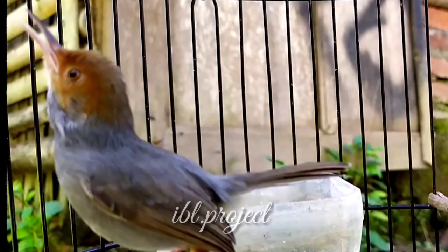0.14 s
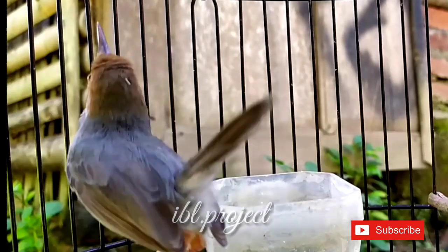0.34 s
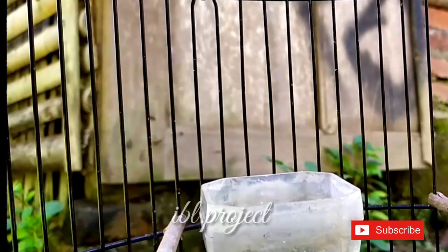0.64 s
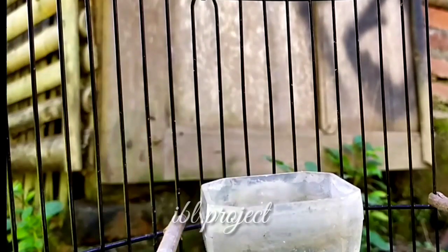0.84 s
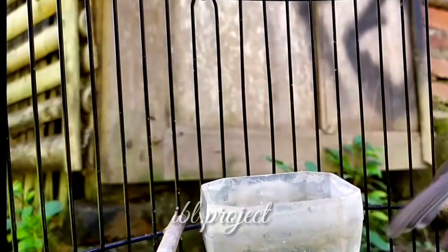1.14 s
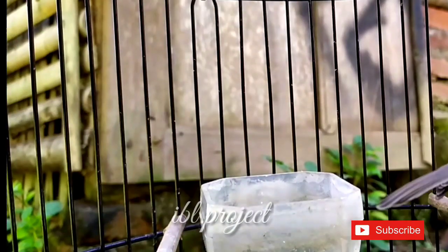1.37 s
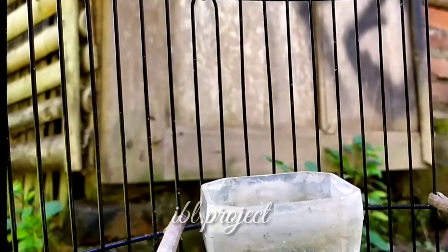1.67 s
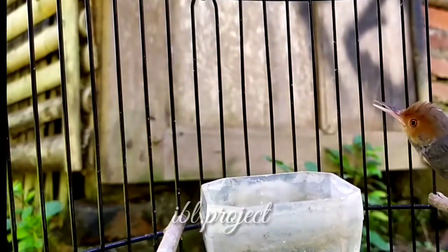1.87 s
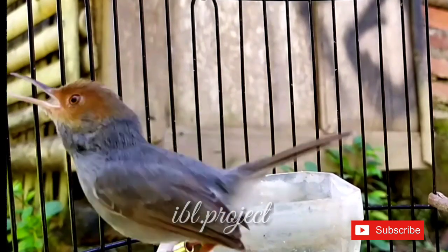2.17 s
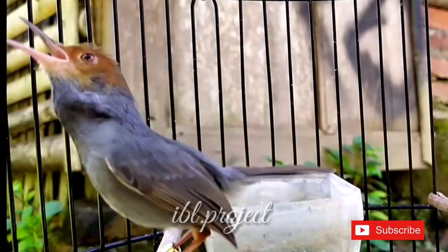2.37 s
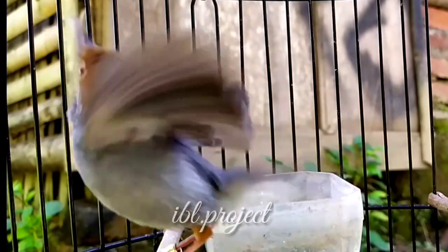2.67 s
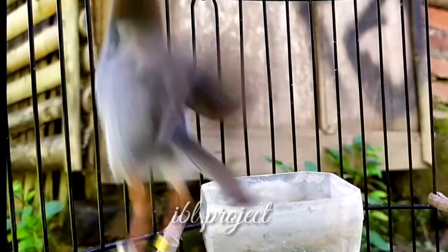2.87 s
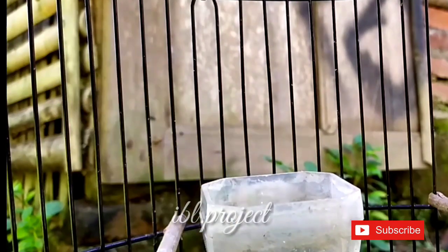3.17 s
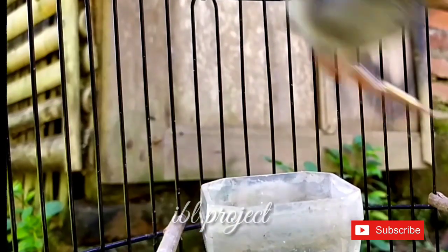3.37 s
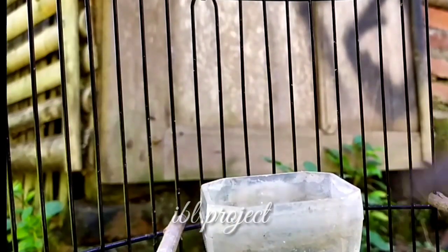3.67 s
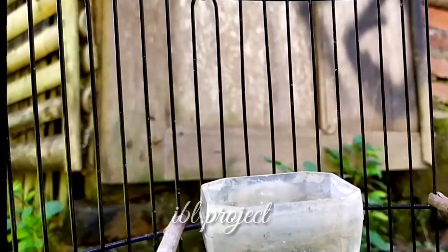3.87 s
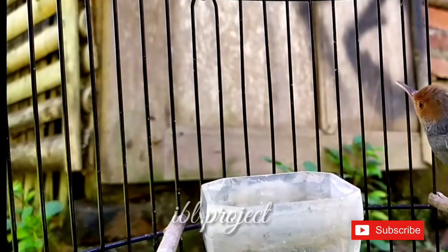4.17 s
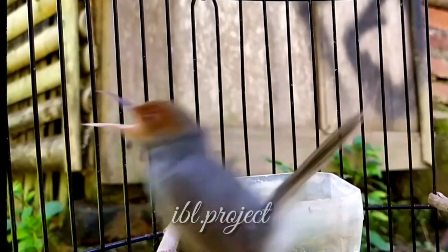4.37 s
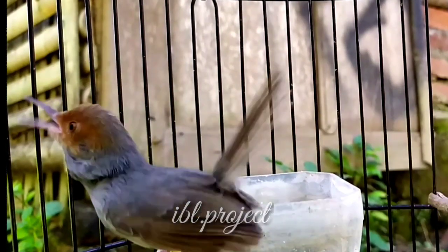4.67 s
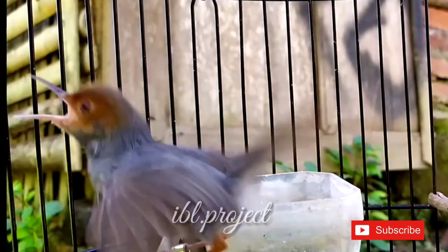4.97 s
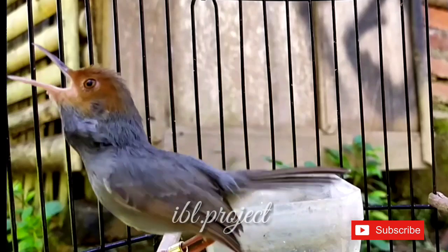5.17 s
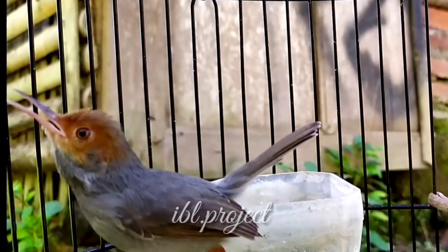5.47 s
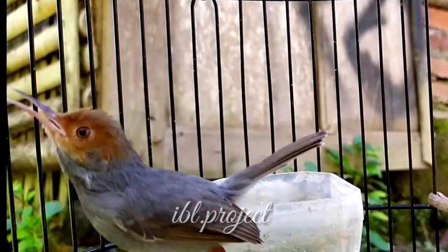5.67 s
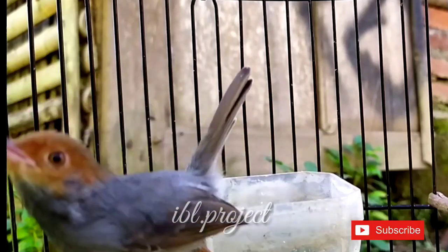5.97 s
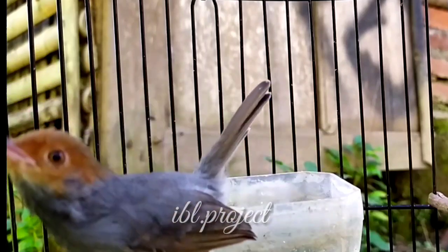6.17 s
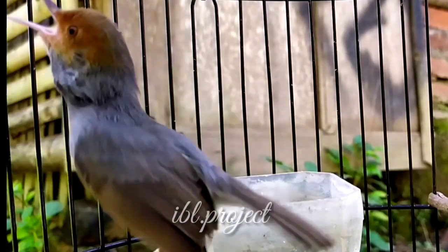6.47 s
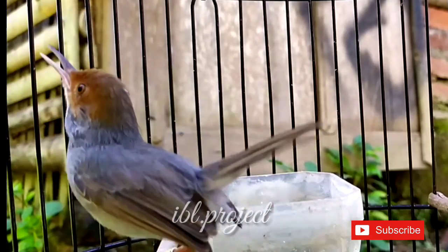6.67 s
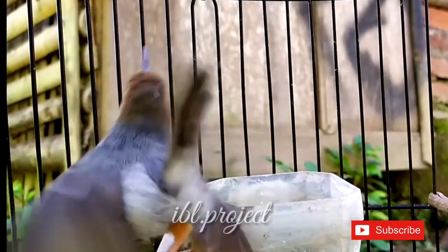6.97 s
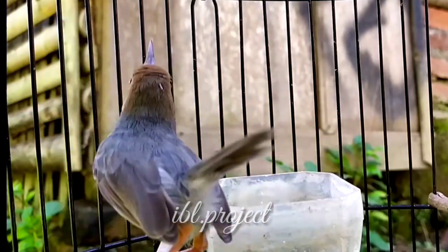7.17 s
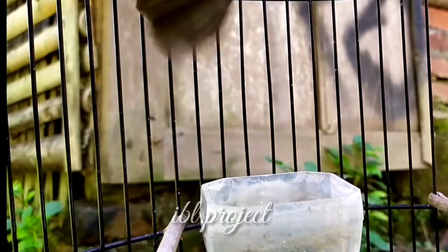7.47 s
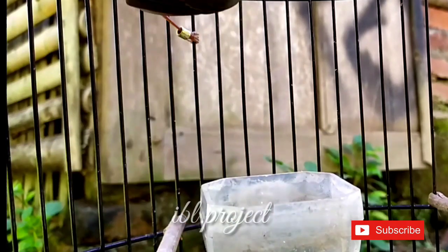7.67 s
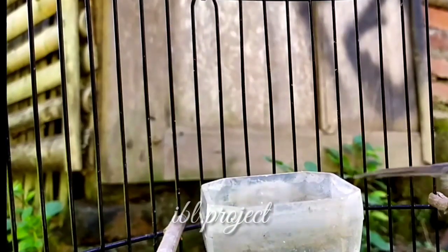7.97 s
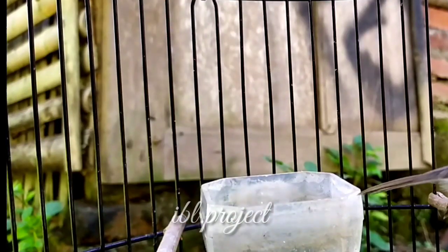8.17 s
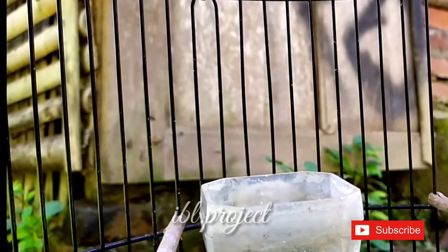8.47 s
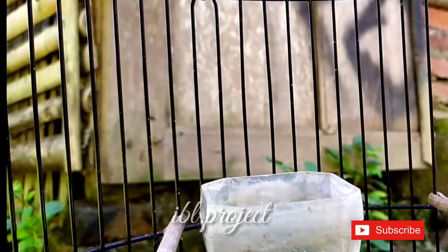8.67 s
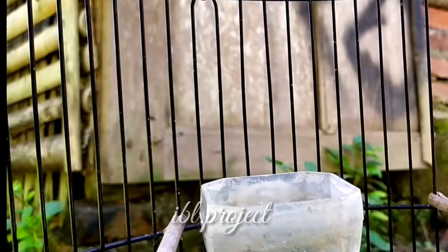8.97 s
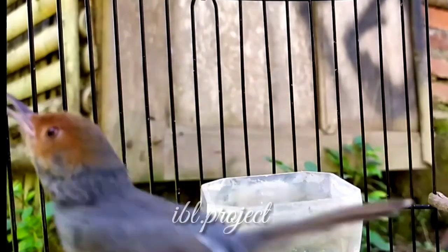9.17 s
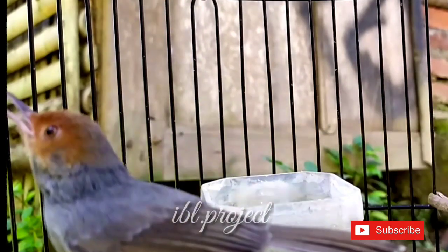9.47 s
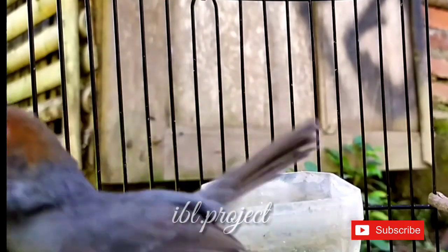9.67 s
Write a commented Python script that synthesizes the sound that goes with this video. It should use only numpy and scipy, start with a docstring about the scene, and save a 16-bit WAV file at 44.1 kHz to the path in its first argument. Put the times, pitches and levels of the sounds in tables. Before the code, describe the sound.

A small songbird in a cage, very close to the microphones, gives a piercing short phrase about every second: a quick rising and sinking warble, then a higher sharp cry. Between phrases come soft wing flutters, light perch knocks and claw scratches. Later phrases begin with tiny bill rattles. Faint birds whistle beyond a walled yard over low rumble and a distant engine hum. The loudest notes are overloaded and squashed.

```python
"""A small caged songbird in a yard repeats a loud phrase: a low warble of tones, then a high cry.
Between phrases it flutters on pulsing noise and lands with knocks and scratches; far birds whistle.
A far engine hums most at three seconds; later, rattles of bill snaps lead most phrases and two phrases wheeze.
The last warble gets no cry. Low rumble and faint air, shaped from noise, run throughout.
The close song overloads the two microphones, and a fast limiter holds it down."""
import sys
import numpy as np
from scipy import signal
from scipy.fft import rfft, irfft, next_fast_len
from scipy.io import wavfile
from scipy.ndimage import uniform_filter1d, minimum_filter1d, map_coordinates

SR = 44100
rng = np.random.default_rng(int(sys.argv[2]) if len(sys.argv) > 2 else 0)


def inscribe(sig):
    """Save sig as 16-bit PCM at rate SR to the path in sys.argv[1].

    A 1-D sig is mono; a 2-D sig holds one channel per row.
    Samples are clipped to [-1, 1] before scaling.
    """
    pcm = np.round(np.clip(np.atleast_2d(sig).T, -1, 1) * 32767)
    wavfile.write(sys.argv[1], SR, pcm.astype(np.int16))


N = 433062  # length in samples

# Levels in the tables are settings before the mix.
# The low warbles: start_s, hook_after_s, arch_rise_s, arch_length_s, level_db, arch_level_db,
# left_minus_right_db, left_lag_s (below zero, the right side lags)
WARBLES = [(-.11, 0.039, 0.036, 0.095, 1, 3, -11, .0004),
           (1.123, 0.048, 0.029, 0.069, -7, 1, -3.5, -.00063),
           (2.3832, 0.05, 0.037, 0.085, -9, 0.5, -14, .00068),
           (4.5799, 0.041, 0.033, .071, -9, -5.5, -19, .00056),
           (5.202, .0445, 0.032, 0.066, -9, -5.5, -8.5, .00057),
           (6.4979, 0.049, 0.034, 0.077, -5, -4.5, -2.5, .0004),
           (7.663, 0.049, 0.0095, .068, -6.5, -7.5, -1.5, .00022),
           (8.632, 0.051, 0.024, 0.07, -3, -1, -3.5, .00007),
           (9.7351, .0475, 0.014, 0.064, -6, 3.5, -6.5, .00043)]
# How each note moves: share_of_note, pitch_ratio, level_db
TICK_SHAPE = [(0, .78, -14), (.18, .88, 0), (.4, .91, 0), (.54, 1, -6), (.68, .86, -4), (.84, .7, -5),
              (1, .6, -14)]
HOOK_SHAPE = [(0, .88, -6.5), (.15, 1, 1.5), (.38, 0.91, -2.5), (.55, .86, -10), (.75, .68, -9.5),
              (1, 0.42, -30)]
ARCH_SHAPE = [(0, .48, -36), (.12, .63, -19), (.25, .8, -6), (.34, .91, -1), (.42, .975, 0), (.5, 1, 0),
              (.58, .985, 1), (.68, .945, 1), (.82, .875, 1), (.94, .81, -2), (1, .8, -10)]
TICK_S, TICK_HZ = .018, 3934  # length and top pitch
HOOK_S, HOOK_HZ = .022, 3424  # the arch follows on at once
ARCH_HZ = 3437
ARCH_BRIGHTENS_DB = 14  # the overtones grow by this much along the arch


def warbles():
    """A tick, a falling hook, then a long arch that rises quickly and sinks slowly."""
    out = np.zeros((2, N))
    for s, hook_after, rise, length, db, arch_db, pan_db, lag in WARBLES:
        hook_s = s + hook_after
        tick = shaped(TICK_SHAPE, progress(TICK_S), TICK_HZ, db)
        hook = shaped(HOOK_SHAPE, progress(HOOK_S), HOOK_HZ, db + 4.0)
        # the first half of the arch's shape fills the rise
        arch_share = np.interp(clock(length), [0, rise, length], [0, .5, 1])
        arch = shaped(ARCH_SHAPE, arch_share, ARCH_HZ, arch_db)
        add(out, *note(s, *tick, pan_db, lag, hiss_db=-28.5, fuzz_db=-31.5))
        add(out, *note(hook_s, *hook, pan_db, lag, hiss_db=-23, fuzz_db=-33.5))
        add(out, *note(hook_s + HOOK_S, *arch, pan_db, lag, hiss_db=-30.5, fuzz_db=-43,
                       brighten_db=ARCH_BRIGHTENS_DB))
    return out


# The high cries: start_s, pip_length_s, pip_pitch_hz, swoop_length_s, pip_level_db, swoop_level_db,
# left_minus_right_db, left_lag_s (below zero, the right side lags)
CRIES = [(0.0901, .02, 4500, .039, 3.5, -0.5, -8, .0004),
         (1.2966, 0.025, 4520, 0.047, 3.5, 2.5, -1, -.00059),
         (2.5774, .022, 4544, 0.044, 3.5, 5, -3.5, .00084), (4.7565, .021, 4733, 0.045, 3, 5.5, 0.5, .0004),
         (5.394, .023, 4580, 0.048, 4, 2, -5, .00066), (6.691, .022, 4576, 0.027, 4, 3, -1.5, .00039),
         (7.85, .023, 4590, .044, 5, 2.5, -8, .0004), (8.831, 0.0093, 4795, 0.05, 10, 4, -2, .00009)]
# How the pip moves: share_of_note, pitch_ratio, level_db
PIP_SHAPE = [(0, 1.08, -6), (.2, 1.025, 0), (.45, .995, 1), (.75, 1.005, 0), (1, 1.02, -7)]
# How loud the swoop is at each pitch of its fall: pitch_hz, level_db
SWOOP_SHAPE = [(1600, -28), (2100, -12), (2800, -3), (3600, 0), (4600, -1), (5400, -3)]
SWOOP_GAP_S = .0115  # silence after the pip
SWOOP_HZ, FALL_HZ_PER_S, FALL_EASE_PER_S, SWOOP_FADE_DB = 5312, 85000, 2.7, 8


def cries():
    """A nearly level pip, then a steep swoop that eases and thins as it falls."""
    out = np.zeros((2, N))
    for s, pip_length, pip_hz, length, pip_db, swoop_db, pan_db, lag in CRIES:
        pip = shaped(PIP_SHAPE, progress(pip_length), pip_hz, pip_db)
        add(out, *note(s, *pip, pan_db, lag, hiss_db=-28, fuzz_db=-32))
        t = clock(length)
        hz = SWOOP_HZ - FALL_HZ_PER_S * t * (1 - FALL_EASE_PER_S * t)
        db = swoop_db + along(SWOOP_SHAPE, hz) - SWOOP_FADE_DB * (t / length) ** 4
        swoop_s = s + pip_length + SWOOP_GAP_S
        add(out, *note(swoop_s, hz, db, pan_db, lag, hiss_db=-21, fuzz_db=-26.0))
    return out


def progress(length):
    """Share of a note gone by, sample by sample."""
    return clock(length) / length


def shaped(shape, share, pitch_hz, db):
    """Pitch and level along a note shape."""
    at, ratio, level = np.transpose(shape)
    return pitch_hz * np.interp(share, at, ratio), db + np.interp(share, at, level)


# Higher tones above the main one: multiple_of_pitch, level_db
OVERTONES = [(2, -38), (3, -44.5), (4, -58.5)]
# Colour of the broadband hiss that sounds with each note: frequency_hz, level_db
HISS_COLOUR = [(300, -11.5), (1200, -11), (2300, 3), (3200, 6), (4800, -2), (6800, -6), (8000, -10.5),
               (9800, -3), (11500, -13.5), (13000, -7), (14500, -3), (16000, -9.5)]
FLUTTER_DB, FLUTTER_PER_S = 1.8, 160  # each note's loudness flutters
STRIPED_DB, STRIPED_FADE_S = 2, .007  # strength and decay of the random paths that stripe the treble


def note(s, hz, db, pan_db, lag, hiss_db, fuzz_db, brighten_db=0):
    """One syrinx (voice organ) tone; its overtones and hiss have a stripy, uneven treble."""
    size, t = len(hz), np.arange(len(hz)) / SR
    hz, db = uniform_filter1d(np.array([hz, db]), size=70, axis=1)
    unsteady_hz = hz * (1 + .002 * wobble(700, SR // 8)[:size])
    phase = 2 * np.pi * np.cumsum(unsteady_hz) / SR
    overtones = np.zeros(size)
    for multiple, overtone_db in OVERTONES:
        strength = amp(overtone_db) + amp(fuzz_db) * wobble(1400, SR // 8)[:size]
        overtones += strength * np.sin(round(multiple) * phase)
    overtones *= amp(brighten_db * (t / t[-1] - 1.0))
    hiss = amp(hiss_db) * noise(HISS_COLOUR, 1, size=SR // 8)[0, :size]
    flutter_db = FLUTTER_DB * wobble(FLUTTER_PER_S, SR // 8)[:size]
    level = amp(db + flutter_db) * gate(t, t[-1], edge=.0025)
    tone_paths = cage(lag, near_db=-8, fade=.011)
    tone = signal.fftconvolve([level * np.sin(phase)], tone_paths, axes=1)
    treble_paths = cage(lag, STRIPED_DB, STRIPED_FADE_S)
    treble = signal.fftconvolve([level * (overtones + hiss)], treble_paths, axes=1)
    sides = amp([[pan_db / 2], [-pan_db / 2]])
    return s, sides * (tone + amp(-1.5) * treble)


def cage(lag, near_db, fade):
    """Direct path and close reflections off cup, floor and bars, drawn afresh at each call."""
    t = clock(.03)
    paths = rng.standard_normal((2, len(t))) * amp(-60 * t / fade) * (t > abs(lag))
    paths *= amp(near_db) / np.linalg.norm(paths, axis=1, keepdims=True)
    # the direct sound, later on one side
    paths[0, max(round(lag * SR), 0)] += 1
    paths[1, max(round(-lag * SR), 0)] += 1
    return paths


# Rattles of the bill: start_s, time_between_snaps_s, length_s, level_db, ring_hz
RATTLES = [(4.496, 0.015, .043, -19.5, 7330), (5.122, 0.016, .059, -14.5, 5640),
           (6.415, 0.017, .044, -16, 5900), (7.5825, .0152, .045, -19, 4617),
           (8.555, 0.015, .048, -15, 5335)]
# Colour of a snap's crack: frequency_hz, level_db
SNAP_COLOUR = [(300, -26), (1500, -8), (2800, -12), (4000, 6.5), (7000, 0), (10000, -11), (14500, -5),
               (16000, -14)]
RATTLE_EDGE_DB = -4.5  # first and last snap against the middle


def bill():
    """A rattle swells and fades; each snap is a crack with a very short ring and a splash off the cage."""
    out, t = np.zeros((2, N)), clock(0.053)
    attack = 1 - np.exp(-t / 0.00018)
    for s, gap, length, db, hz in RATTLES:
        for k, place in enumerate(np.linspace(-1, 1, round(length / gap))):
            fade = amp(-60 * t / 0.0062) + 0.21 * amp(-60 * t / 0.065)  # crack, then splash
            crack = noise(SNAP_COLOUR, 0.15, size=len(t)) * fade
            ring = np.sin(2 * np.pi * hz * t) * amp(-60 * t / 0.0031)
            snap_level = amp(db + RATTLE_EDGE_DB * place ** 2)
            add(out, s + k * gap, snap_level * (0.6 * crack + 1.5 * ring) * attack)
    return out


# A hoarse wheeze rides on two phrases: start_s, length_s, level_db
WHEEZES = [(5.212, 0.15, -29), (6.463, 0.27, -44)]
# Colour of the wheeze: frequency_hz, level_db
WHEEZE_COLOUR = [(3500, -30.5), (5000, -12.5), (5600, 0.5), (6200, -0.5), (7200, -15), (10000, -21.5),
                 (14500, -13), (16000, -10.5)]


def wheeze():
    """Air forced past the syrinx without a clear pitch: noise of wavering loudness."""
    level = np.zeros(N)
    for s, length, db in WHEEZES:
        add(level, s, amp(db) * gate(clock(length), length, edge=0.11))
    return level * amp(3.3 * wobble(100, N)) * noise(WHEEZE_COLOUR, 0.36)


# Soft, bright ticks between phrases: start_s, level_db
SOFT_TICKS = [(0.234, -46.5), (0.347, -47), (2.715, -49.5), (2.899, -49), (3.058, -48), (3.208, -46),
              (3.516, -47), (6.405, -52), (6.955, -46), (7.164, -47.5), (7.372, -47), (7.454, -54.5)]
# Bright colour of the ticks, also used for claws: frequency_hz, level_db
SCRATCH_COLOUR = [(500, -19.5), (2000, -13), (3500, -5.5), (4700, 1), (7000, 1.5), (9000, -7.5),
                  (13000, -5.5), (16000, -15)]
# Bursts of wingbeats: start_s, level_db
FLIGHTS = [(.56, -54), (1.332, -45.5), (2.189, -49), (3.25, -50), (4.06, -54.5), (4.76, -53.5), (5.43, -52),
           (6.13, -47), (6.83, -53), (7.981, -50.5), (8.421, -45), (9.3, -46.5)]
# Colour of air pushed by the wings: frequency_hz, level_db
WING_AIR_COLOUR = [(30, -21), (70, -5), (130, 3), (220, 2.5), (330, -12.5), (500, -24), (1500, -40),
                   (6000, -46.5)]
SOFT_TICK_S = 0.056  # a soft tick fades 12 dB in this time
FLIGHT_S = .2
SWELL_LEAD_S, SWELL_S, SWELL_DB = .12, .48, -58.5  # faint hiss around each phrase


def ticks_wings_and_hiss():
    """Soft bright ticks sound between phrases; beating wings push pulses of air; faint hiss swells and fades
    around each phrase."""
    tick, beat, swell = np.zeros((3, N))
    for s, db in SOFT_TICKS:
        t = clock(3 * SOFT_TICK_S)
        add(tick, s, amp(db + 4.0 - 12 * t / SOFT_TICK_S) * gate(t, t[-1], edge=0.0039))
    for s, db in FLIGHTS:
        t = clock(FLIGHT_S)
        wingbeats = 1 + .7 * np.sin(2 * np.pi * 26 * t)  # 26 a second
        add(beat, s, amp(db) * gate(t, FLIGHT_S, edge=0.023) * wingbeats)
    for s, *_ in WARBLES:
        add(swell, s - SWELL_LEAD_S, amp(SWELL_DB) * gate(clock(SWELL_S), SWELL_S, edge=SWELL_S / 2))
    ticking = tick * unit(amp(3 * wobble(330, N))) * noise(SCRATCH_COLOUR, 0.1215)
    wings = beat * noise(WING_AIR_COLOUR, 1.0)
    return ticking + wings + swell * noise(AIR_COLOUR, 0.38)


# Feet land on perches and bars: start_s, knock_level_db, claw_level_db
LANDINGS = [(0.656, -51.5, -51.5), (0.809, -49.5, -44), (1.92, -44.5, -66), (2.241, -41, -49),
            (3.029, -55.5, -53.5), (3.594, -48.5, -72), (4.17, -49, -57.5), (4.495, -41.5, -58.5),
            (5.926, -46.5, -48), (7.109, -55, -54), (8.026, -41.5, -58), (8.465, -56, -54.5),
            (9.182, -50.5, -55.5), (9.279, -38, -49.5)]
# Resonances of the perch: pitch_hz, width_hz, level_db
PERCH = [(820, 12, 0.5), (937, 27, 3), (1710, 26, 0.5), (1912.6, 9.9, -7), (2030, 220, -9),
         (3217, 43, -14.5)]
# Colour of the cage frame's thud: frequency_hz, level_db
THUD_COLOUR = [(100, -5.5), (300, 2.5), (1200, -5), (2200, -17.5), (4000, -22)]
SECOND_FOOT_S, SECOND_FOOT_DB = 0.013, -11  # the other foot follows, more lightly


def perches():
    """One foot after the other knocks the perch and claws scrape it; the cage chatters briefly."""
    knock, claw, t = np.zeros(N), np.zeros(N), clock(.2)
    strike = 1 - np.exp(-t / 0.00073)
    for s, knock_db, claw_db in LANDINGS:
        for after, foot_db in [(0, 0), (SECOND_FOOT_S, SECOND_FOOT_DB)]:
            add(knock, s + after, amp(knock_db + foot_db - 60 * t / 0.17) * strike)
            add(claw, s + after, amp(claw_db + foot_db - 60 * t / 0.15) * strike)
    chatter = unit(amp(5.8 * wobble(300, N)))
    wood = unit(filtered(rng.standard_normal((2, N)), perch_response))
    knocks = knock * (0.8 * wood + 0.87 * noise(THUD_COLOUR, .6))
    return chatter * (knocks + 1.2 * claw * noise(SCRATCH_COLOUR, .2))


def perch_response(f):
    """Sum of the perch's resonances, each a peak in frequency, with alternating signs."""
    total = 0
    for k, (centre, width, db) in enumerate(PERCH):
        peak = 1j * f * width / (centre * centre - f * f + 1j * f * width)
        total = total + (-1) ** k * amp(db) * peak
    return total


def porch(x, fade):
    """Quick reflections from the door and ground beside the cage."""
    t = clock(.15)
    paths = rng.standard_normal((2, len(t))) * amp(-60 * t / fade) * (1 - np.exp(-t / .004))
    return signal.fftconvolve(x, paths / np.linalg.norm(paths[0]), axes=1)[:, :N]


# How long the yard walls ring: frequency_hz, time_to_fall_60_db_s
WALLS = [(200, 0.75), (1900, .18), (2900, 0.25), (4600, .33), (6500, 0.11), (14000, 0.085)]


def echo(x):
    """Diffuse answer of the yard walls; each frequency dies at its own speed."""
    hz, t, z = signal.stft(rng.standard_normal((2, SR // 2)), SR, nperseg=256)
    fade = amp(-60 * t / along(WALLS, hz)[:, None])
    tail = signal.istft(z * fade, SR, nperseg=256)[1]
    return signal.fftconvolve(x, tail / np.linalg.norm(tail[0]), axes=1)[:, :N]


# Whistles of other birds: start_s, length_s, start_pitch_hz, middle_pitch_hz, end_pitch_hz, level_db
WHISTLES = [(0.456, 0.13, 3736, 3890, 4740, -63), (1.025, 0.11, 7720, 7230, 7030, -51.5),
            (1.42, 0.73, 2076, 2060, 2087, -67), (3.6, 0.19, 1600, 1494, 1420, -71),
            (4.378, 0.51, 1892, 1889, 1875, -41), (7.264, 0.12, 1995, 2242, 2285, -53),
            (7.493, 0.1, 1686, 1728, 1640, -57), (7.608, 0.14, 2100, 2198, 2270, -47),
            (8.191, 0.096, 2034, 2050, 2087, -49.5), (8.335, 0.094, 1666, 1663, 1663, -62.5),
            (9.404, .08, 6810, 7175, 7170, -59.5), (9.519, 0.233, 1970, 2263, 1966, -53)]
# Far twittering: start_s, length_s, level_db
TWITTERS = [(1.638, 0.88, -61.5), (3.85, 1, -62), (6.887, 0.48, -62.5), (8.246, 0.63, -61.5)]
# Colour of the twittering: frequency_hz, level_db
TWITTER_COLOUR = [(1500, -32), (2700, -13.5), (3800, -1), (5000, -9), (6200, -25.5), (10000, -44)]


def neighbours():
    """Other birds whistle and twitter far off; the whistles come mostly by way of the walls."""
    calls, twitter = np.zeros((2, N)), np.zeros(N)
    for s, length, *pitches, db in WHISTLES:
        add(calls, s, whistle(length, pitches, db))
    for s, length, db in TWITTERS:
        t = clock(length)
        add(twitter, s, amp(db) * gate(t, length, edge=length / 2))
    far_calls = amp(-4) * calls + amp(1.5) * echo(calls)
    return far_calls + twitter * amp(3.3 * wobble(28, N)) * noise(TWITTER_COLOUR, 0.24)


def whistle(length, pitches, db):
    """A slightly unsteady tone bending through three pitches."""
    t = clock(length)
    bend = np.polyfit([0, .5, 1], pitches, 2)
    hz = np.polyval(bend, t / length) * (1 + 0.0056 * wobble(63, SR)[:len(t)])
    return amp(db) * gate(t, length, edge=length / 4) * np.sin(2 * np.pi * np.cumsum(hz) / SR)


# Colour of the low rumble: frequency_hz, level_db
RUMBLE_COLOUR = [(12, -63.5), (20, -31), (29, -19.5), (36, -17), (60, 1), (135, -9), (177, -10),
                 (206, -19.5), (238, -24), (269, -22), (500, -41), (650, -61), (1100, -120)]
# How loud the rumble is over time: time_s, level_db
RUMBLE_LEVEL = [(0, -48.5), (1.4, -46.5), (2.8, -49.5), (5, -51), (7.4, -52.5), (9.82, -52.5)]
# How loud the far engine is over time: time_s, level_db
ENGINE_LEVEL = [(0, -52), (3.1, -44.5), (4.6, -59), (9.82, -58)]
# Colour of faint air, also used for the hiss around phrases: frequency_hz, level_db
AIR_COLOUR = [(240, -30.5), (400, -6), (1230, -13.5), (2340, -12.5), (3650, -20), (4000, -14.5),
              (5600, -20), (7980, -20), (11500, -20.5), (15700, -31)]
AIR_DB = -67


def yard():
    """Low rumble of the neighbourhood, a far idling engine and faint air."""
    t = np.arange(N) / SR
    rumble_db = np.interp(t, *np.transpose(RUMBLE_LEVEL)) + 0.79 * wobble(3.9, N)
    rumble = amp(rumble_db) * noise(RUMBLE_COLOUR, .88)
    rumble = filtered(rumble, lambda hz: hz ** 2 / (hz ** 2 + 30 ** 2))  # less below 30 Hz
    firing = 2 * np.pi * np.cumsum(59 + 0.42 * wobble(2.5, N)) / SR  # a wavering 59 Hz
    engine_level = amp(np.interp(t, *np.transpose(ENGINE_LEVEL)))
    engine = engine_level * (np.sin(firing) + amp(-12) * np.sin(3 * firing))
    air = amp(AIR_DB + 1.2 * wobble(1.7, N)) * noise(AIR_COLOUR, 0.13)
    return amp(3.0) * rumble + engine + air


def amp(db):
    """Decibels to gain."""
    return 10 ** (np.asarray(db) / 20)


def unit(x):
    """Scale to rms (average strength) 1."""
    return x / np.sqrt(np.mean(x ** 2) + 1e-20)


def along(points, hz):
    """Read a curve of (Hz, value) points on a log frequency axis."""
    f, v = np.transpose(points)
    return np.interp(np.log(hz + 1), np.log(f + 1), v)


def clock(length):
    """Sample times of a sound."""
    return np.arange(max(int(length * SR), 8)) / SR


def wobble(rate, size):
    """A smooth random curve, rate knots a second."""
    knots = rng.standard_normal(size // 20 + 8)
    return map_coordinates(knots, [np.arange(size) * rate / SR], mode='wrap')


def filtered(x, response):
    """Reshape the spectrum of x by a response of frequency."""
    size = x.shape[-1]
    m = next_fast_len(size + 4096)
    return irfft(rfft(x, m) * response(np.fft.rfftfreq(m, 1 / SR)), m)[..., :size]


def noise(colour, alike, size=N):
    """Coloured stereo noise of rms 1; alike is the likeness of its two sides."""
    a, b = filtered(rng.standard_normal((2, size)), lambda hz: amp(along(colour, hz)))
    turn = np.arccos(np.clip(alike, -1, 1)) / 2
    shared, apart = np.cos(turn) * a, np.sin(turn) * b
    return unit(np.array([shared + apart, shared - apart]))


def add(track, s, x):
    """Mix x into the track at time s."""
    start = round(s * SR)
    lo, hi = max(start, 0), min(start + x.shape[-1], N)
    if hi > lo:
        track[..., lo:hi] += x[..., lo - start:hi - start]


def gate(t, length, edge):
    """Soft opening and closing of a sound."""
    return np.sin(np.pi / 2 * np.clip(np.minimum(t, length - t) / edge, 0, 1)) ** 2


def scene():
    """The caged bird with its reflections, in the yard."""
    bird = warbles() + cries() + bill() + wheeze()
    moves = ticks_wings_and_hiss() + perches()
    near = amp(-25) * porch(bird, fade=.13)
    far = amp(-32) * echo(bird) + amp(-9) * echo(moves)
    return bird + near + moves + far + neighbours() + yard()


def limiter(x, ceiling_db):
    """Each channel is turned down while its short-term level is too high, and recovers within milliseconds."""
    level = np.sqrt(np.abs(uniform_filter1d(x ** 2, size=120, axis=1)))
    need = np.minimum(1, amp(ceiling_db) / (level + 1e-9))
    held_down = minimum_filter1d(need, size=150, axis=1)
    return x * uniform_filter1d(held_down, size=110, axis=1)


TOP_HZ = 15830  # nearly nothing passes above this


def record(dry):
    """The microphones overload on the loudest notes, then come the limiter and the band limit."""
    overload = amp(2.0)
    bent = dry / (1 + np.abs(dry / overload) ** 4) ** (1 / 4)
    held = limiter(bent, ceiling_db=-7.5)
    return filtered(held, lambda hz: 1 / (1 + (hz / TOP_HZ) ** 140))


dry = scene()
out = record(dry)
inscribe(out)
```